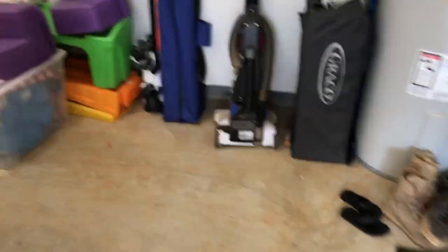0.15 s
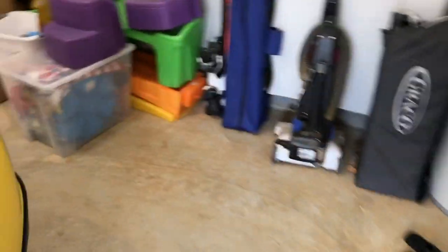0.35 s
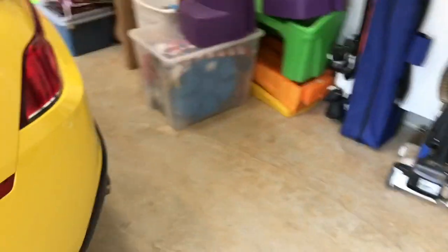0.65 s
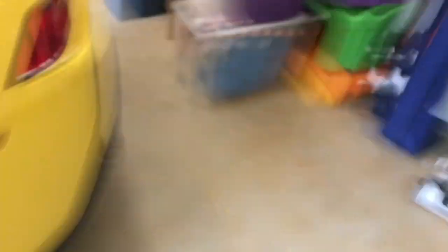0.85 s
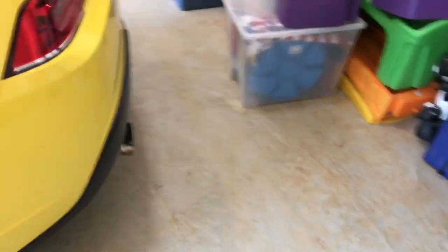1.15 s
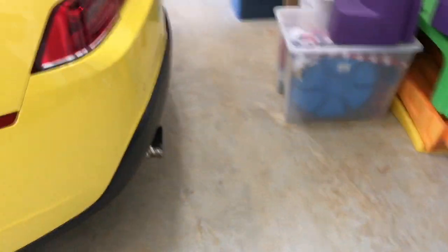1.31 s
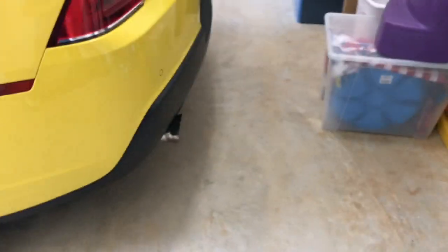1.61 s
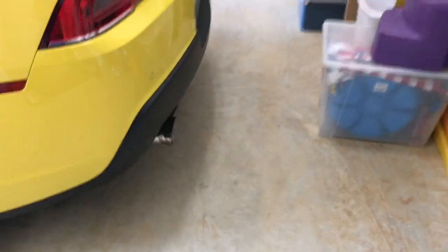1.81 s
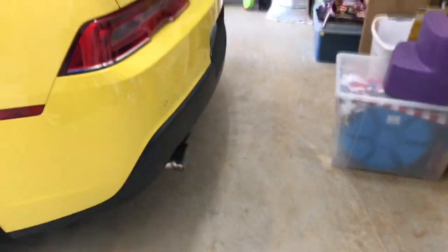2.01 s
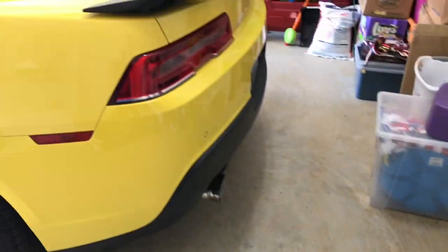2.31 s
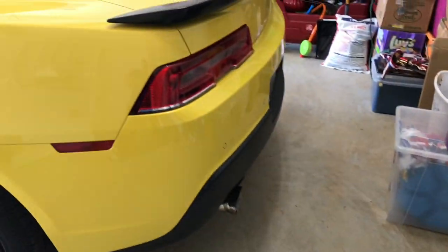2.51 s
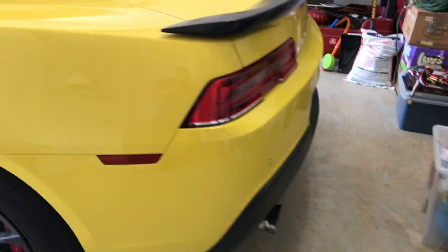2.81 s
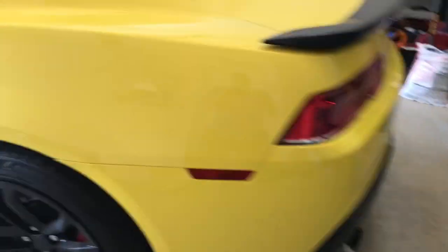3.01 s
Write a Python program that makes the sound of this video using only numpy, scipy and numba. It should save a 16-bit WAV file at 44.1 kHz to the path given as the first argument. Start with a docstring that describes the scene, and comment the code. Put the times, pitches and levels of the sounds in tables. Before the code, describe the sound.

Deep, loping V8 idle close to a car's tailpipe, broken by one short silence.

```python
"""In a garage, microphone close beside the tailpipe of an idling V8, carried round the rear corner.
Each firing pushes a deep boom, rings the exhaust and lets out a puff of rasping, hissing gas.
Unequal cylinders make the idle lope, and the echoes off the walls shift with every step.
The sound cuts out for a moment and comes back louder and smoother, then the idle sags a little."""
import sys
import numpy as np
from scipy import signal
from scipy.fft import rfft, irfft, next_fast_len
from scipy.io import wavfile
from scipy.ndimage import uniform_filter1d
from numba import njit

SR = 44100
rng = np.random.default_rng(int(sys.argv[2]) if len(sys.argv) > 2 else 0)


def materialize(psi):
    """Save the field psi as 16-bit PCM at rate SR to the path in sys.argv[1].

    A 1-D psi becomes a single channel; in a 2-D psi each row is a channel.
    """
    bounded = np.clip(np.atleast_2d(psi).T, -1, 1)
    quanta = np.round(bounded * 32767).astype(np.int16)
    wavfile.write(sys.argv[1], SR, quanta)


N = 138915

# Idle before and after the gap: start_s, end_s, first_firing_s, lope_db, unevenness (0-1)
STRETCHES = [(-.01, 0.785, .0101, -24.5, 0.4), (1.205, 3.2, 1.2226, -41.5, 0.58)]
# Engine speed: time_s, firing_rate_hz
FIRING_RATE = [(0, 61.33), (0.3, 60.47), (0.5, 61.04), (0.79, 61.11), (1.205, 60.05), (1.38, 58.3),
               (1.72, 58.8), (2.03, 58.48), (2.16, 57.15), (2.35, 58.0), (2.53, 55.39), (2.68, 57.04),
               (2.85, 54.87), (2.97, 55.83), (3.15, 55.97)]
# Cylinders in firing order, at full unevenness: strength_db
CYLINDERS = [-0.5, -1, 2, 0.5, 0.5, 0.5, 3, .5]
# Levels at the microphone: time_s, boom_db, octave_db, ring_db, burble_db, rasp_db, hiss_db
MIC_LEVELS = [(0, -19.9, -21.5, -24, -25, -27.5, -27), (0.15, -20.5, -20, -28.5, -24, -25.5, -27),
              (0.35, -17, -21.5, -24.5, -24, -25.1, -26.5), (0.5, -16.5, -27, -23, -18, -25.6, -27.5),
              (0.66, -13, -24.5, -28, -21.1, -26, -25.5), (0.78, -14.5, -33.5, -16, -17, -22, -26.0),
              (1.205, -14.5, -19, -23, -9, -18, -19.5), (1.3, -12, -26, -10.5, -27.5, -20.5, -24.5),
              (1.42, -12, -26, -14.5, -26, -23.5, -25.5), (1.55, -12.5, -30.6, -15, -26.5, -24.5, -28.0),
              (1.8, -11, -29.4, -23.5, -27.5, -27, -29.0), (1.98, -11.5, -30.3, -22.0, -29, -28, -30),
              (2.15, -14.5, -32, -32.5, -28.7, -28, -30), (2.35, -13, -30, -26.5, -29, -26.5, -30.5),
              (2.55, -18, -20, -38, -24, -26, -29.5), (2.72, -14.5, -22.5, -23.5, -25.5, -26, -29),
              (2.88, -19.5, -17.5, -42, -23, -24, -28), (3.15, -16, -24.4, -23, -20.5, -26.5, -27)]
# Centre of the pipe ring: time_s, pitch_hz
PIPE_RING = [(0, 280), (1.3, 267.3), (1.55, 270), (1.8, 294), (2.1, 284.5), (2.6, 265.4), (3.15, 263)]
# Exhaust and garage resonances stirred by uneven firings: pitch_hz, width_hz, relative_db
BURBLE_MODES = [(112, 80, -4.5), (156.8, 32, -2.5), (216.8, 35, 0), (257.4, 22, 1.5), (297.5, 50, -2),
                (400, 120, -16)]
# Spectrum of rasp and clatter, before and after the gap: frequency_hz, relative_db
GAS_BEFORE = [(220, -43), (380, -3), (453, -14.5), (535, -1), (575, -8.5), (678, -2.5), (737, -5.5),
              (834, -3), (915, -6.5), (1100, -4.5), (1240, -10), (1410, -8), (1550, -10.5), (2050, -4.5),
              (2570, -4.5), (3070, -12), (4500, -16), (5850, -41.5), (9900, -120)]
GAS_AFTER = [(220, -32), (380, 2), (409, -34), (430, -3), (463, -8.5), (575, -2), (618, -4.5), (664, -2),
             (860, -5), (934, -2), (1070, -8.5), (1360, -5.5), (1490, -10.5), (2050, -4), (2630, -7),
             (3070, -14), (4500, -13), (5850, -47), (9900, -120)]
# Spectrum of the hiss, before and after the gap: frequency_hz, relative_db
HISS_BEFORE = [(1760, -28), (3000, -0.5), (3600, -4), (3890, -1.5), (5030, -8.5), (5670, -3), (7990, -7.5),
               (10200, -6), (11300, -5), (12600, -4.5), (15100, -11), (16000, -16.5)]
HISS_AFTER = [(1760, -38), (3000, -21), (3330, 0.5), (3620, -6.5), (4500, -2.5), (4930, -8.5), (5710, -1.5),
              (6430, -3), (7770, -7.5), (9380, -1.5), (10400, -6), (11300, -3), (15100, -11), (16000, -15)]
# Spits of gas that stand out of the hiss: peak_s, pitch_hz, level_db
SPITS = [(.37, 11900, -28), (.65, 11500, -31), (.707, 6600, -32), (.755, 11940, -24), (1.569, 6200, -27),
         (1.672, 2510, -24.5), (1.676, 11300, -28), (1.868, 2170, -25), (1.885, 9500, -33),
         (1.975, 1940, -22), (2.46, 2590, -25), (2.65, 9600, -30.5), (2.87, 2240, -27.5)]

RASP_USUAL_DB, HISS_USUAL_DB, CLATTER_USUAL_DB = -25, -22.5, -26.5
CLATTER_FOLLOWS, TOP_FOLLOWS = 0.53, 0.5  # dB of clatter per dB of rasp; extra top treble per dB of hiss
CUT_S, RETURN_S = 0.0037, 0.00076  # decay into the gap, rise out of it


def firings(t, phase, unevenness, jitter_s=0.0001, scatter_db=1.17):
    """Times and strengths of the firings: the next cylinder fires at each whole number of phase."""
    number = np.arange(-120, 240)
    early_late, weak_strong = rng.standard_normal((len(number), 2)).T
    times = np.interp(number, phase, t, left=-10, right=10) + jitter_s * early_late
    cylinder_db = unevenness * np.array(CYLINDERS)[number % len(CYLINDERS)]
    return times, undb(cylinder_db + scatter_db * weak_strong)


def exhaust(t, phase, times, sizes, lope_db, ring_lead_s=0.0025):
    """The low voice at the tailpipe: firings boom and ring the pipe; their unevenness makes it burble."""
    boom_db, octave_db, ring_db, burble_db = curve(MIC_LEVELS, t)[:4]
    boom = tone(phase, boom_db) + tone(2 * phase, octave_db) + tone(3 * phase, level_db=-36)
    # beats against the octave every fourth firing, peaking on firing 2
    lope = tone(2 * phase - (phase - 2) / 4, lope_db)
    blows = pulses(t, times - ring_lead_s, sizes ** 0.7)
    ring = undb(ring_db) * unit(resonate(blows, curve(PIPE_RING, t)[0], width_hz=63.4))
    uneven = pulses(t, times, sizes / sizes.mean() - 1)
    stir = unit(uneven) + 0.18 * rng.standard_normal(len(t))
    modes = sum(undb(db) * resonate(stir, hz, width) for hz, width, db in BURBLE_MODES)
    burble = undb(burble_db) * steadied(modes)
    rumble = undb(-57) * unit(resonate(stir, hz=70, width_hz=41))
    return boom + lope + ring + burble + rumble


def escaping_gas(t, times, sizes, gas_spectrum, hiss_spectrum):
    """The high voice: rasp, clatter and hiss leave the tailpipe one after the other at each firing."""
    rasp_db, hiss_db = curve(MIC_LEVELS, t)[4:]
    clatter_db = CLATTER_USUAL_DB + CLATTER_FOLLOWS * (rasp_db - RASP_USUAL_DB)
    rasp = puffs(t, times + 0.001, sizes, decay_s=0.0074, scatter_db=3, steady=3.3,
                 grain_db=-0.8, knock_db=-5, room_db=4)
    clatter = puffs(t, times + 0.0022, sizes, decay_s=0.0069, scatter_db=2, steady=1.2,
                    grain_db=1.15, knock_db=-8.5, room_db=0.5)
    hiss = puffs(t, times + 0.0031, sizes, decay_s=0.012, scatter_db=2.5, steady=1.3,
                 grain_db=0.8, knock_db=-21, room_db=-10.5)
    rasp = colour(flutter(rasp, depth_db=1.5, frame=1024), gas_spectrum, lo_hz=370, hi_hz=1550)
    clatter = colour(flutter(clatter, depth_db=2, frame=640), gas_spectrum, lo_hz=1550, hi_hz=3600)
    hiss = colour(flutter(hiss, depth_db=1.5, frame=192), hiss_spectrum, lo_hz=3000, hi_hz=17000)
    top = signal.sosfiltfilt(signal.butter(2, 11000, "high", fs=SR, output="sos"), hiss)
    top_gain = undb(TOP_FOLLOWS * (hiss_db - HISS_USUAL_DB))  # stronger hiss is brighter
    hiss = hiss + (top_gain - 1) * top
    return undb(rasp_db) * rasp + undb(clatter_db) * clatter + undb(hiss_db) * hiss


def puffs(t, times, sizes, decay_s, scatter_db, steady, grain_db, knock_db, room_db):
    """Each firing adds a grainy puff to a steady flow of gas; its knock and the gas echo off the walls."""
    scatter = undb(scatter_db * np.clip(rng.standard_normal(len(times)), -2, 2))
    kicks = pulses(t, times, sizes * scatter)
    decay = np.exp(-np.arange(SR // 10) / SR / decay_s)
    flow = steady + unit(signal.fftconvolve(kicks, decay)[:len(t)])
    grains = np.repeat(undb(grain_db * rng.standard_normal(len(t) // 24 + 1)), 24)[:len(t)]
    gas = unit(flow * grains * rng.standard_normal(len(t)))
    knock = unit(garage(pulses(t, times, sizes), t, t60_s=0.2))
    return gas + undb(knock_db) * knock + undb(room_db) * garage(gas, t, t60_s=0.56)


def flutter(x, depth_db, frame):
    """Narrow patches of the spectrum briefly swell and fade on their own."""
    spectrum = signal.stft(x, nperseg=frame)[2]
    blur = np.outer(np.hanning(9), np.hanning(9))
    patches = signal.fftconvolve(rng.standard_normal(spectrum.shape), blur, "same")
    return signal.istft(spectrum * undb(depth_db * unit(patches)), nperseg=frame)[1][:len(x)]


def spits(t, half_length_s=0.011):
    """Escaping gas spits in short swells of narrow-band noise."""
    out = 0
    for peak_s, hz, db in SPITS:
        swell = np.exp(-((t - peak_s) / half_length_s) ** 2)
        band = unit(resonate(rng.standard_normal(len(t)), hz, width_hz=0.23 * hz))
        out += undb(db) * swell * band
    return out


def garage(x, t, t60_s, step_s=0.2983):
    """Echoes off the walls, fading from one pattern to the next as the microphone moves a step."""
    out = np.zeros(len(x) + SR)
    age = np.arange(SR // 3) / SR
    for centre_s in np.arange(-1, 14) * step_s:
        near = np.flatnonzero(abs(t - centre_s) < step_s)
        tail = rng.standard_normal(len(age)) * np.exp(-np.log(1000) * age / t60_s)
        if len(near):
            crossfade = np.cos(np.pi / 2 * (t[near] - centre_s) / step_s)
            echo = signal.fftconvolve(x[near] * crossfade, tail / np.linalg.norm(tail))
            out[near[0]:near[0] + len(echo)] += echo
    return out[:len(x)]


def pulses(t, times, sizes):
    """One click for each firing."""
    out = np.zeros(len(t))
    at = np.round((times - t[0]) * SR).astype(int)
    inside = (at >= 0) & (at < len(t))
    np.add.at(out, at[inside], sizes[inside])
    return out


def tone(cycles, level_db):
    """A cosine at the given rms level."""
    return np.sqrt(2) * undb(level_db) * np.cos(2 * np.pi * cycles)


def colour(x, spectrum, lo_hz, hi_hz):
    """Shape a sound with one band of a spectrum, at rms 1."""
    f = np.maximum(np.fft.rfftfreq(len(x), 1 / SR), 1)
    hz, db = np.array(spectrum, float).T
    band = 1 / np.sqrt((1 + (lo_hz / f) ** 20) * (1 + (f / hi_hz) ** 20))
    shape = undb(np.interp(np.log(f), np.log(hz), db))
    return unit(irfft(rfft(x) * band * shape, len(x)))


def resonate(x, hz, width_hz):
    """A steep resonance: the band-pass applied twice."""
    centre_hz = hz * np.ones(len(x))
    once = bandpass(x, centre_hz, float(width_hz))
    return bandpass(once, centre_hz, float(width_hz))


@njit
def bandpass(x, hz, width_hz):
    """State-variable band-pass with a moving centre."""
    out, band_state, low_state = np.empty(len(x)), 0., 0.
    for i in range(len(x)):
        tuning, damping = np.tan(np.pi * hz[i] / SR), width_hz / hz[i]
        band = (band_state + tuning * (x[i] + 1e-18 - low_state)) / (1 + tuning * (tuning + damping))
        band_state = 2 * band - band_state
        low_state += 2 * tuning * band
        out[i] = damping * band
    return out


def steadied(x, window_s=0.04):
    """Hold the running level at rms 1, so that the sound putters evenly."""
    return x / np.sqrt(uniform_filter1d(x ** 2, int(window_s * SR)) + 1e-12)


def curve(table, t):
    """Every column of a table, joined by straight lines in time."""
    times, *columns = np.array(table, float).T
    return [np.interp(t, times, column) for column in columns]


def undb(db):
    """Decibels to gain."""
    return 10 ** (np.asarray(db) / 20)


def unit(x):
    """Scale to rms 1."""
    return x / np.sqrt(np.mean(x ** 2))


def scene():
    """One microphone by the tailpipe: two stretches of idle with silence between."""
    lead = next_fast_len(N + SR // 5) - N  # the engine is already running at the start
    t = np.arange(-lead, N) / SR
    spectra = [(GAS_BEFORE, HISS_BEFORE), (GAS_AFTER, HISS_AFTER)]
    firing_count = np.cumsum(curve(FIRING_RATE, t)[0]) / SR
    out = 0
    for (start_s, end_s, first_firing_s, lope_db, unevenness), pair in zip(STRETCHES, spectra):
        phase = firing_count - np.interp(first_firing_s, t, firing_count)
        times, sizes = firings(t, phase, unevenness)
        fade_in = np.clip((t - start_s) / RETURN_S + 0.5, 0, 1)
        fade_out = np.exp(-np.maximum(t - end_s, 0) / CUT_S)
        engine = exhaust(t, phase, times, sizes, lope_db) + escaping_gas(t, times, sizes, *pair)
        out += fade_in * fade_out * engine
    return (out + spits(t))[None, lead:]


def record(dry):
    """The microphone signal clips at full scale and loses its top above 15.9 kHz."""
    lowpass = signal.ellip(10, 0.2, 80, 15900, fs=SR, output="sos")
    return signal.sosfilt(lowpass, np.clip(dry, -1, 1))


dry = scene()
out = record(dry)
materialize(out)
```